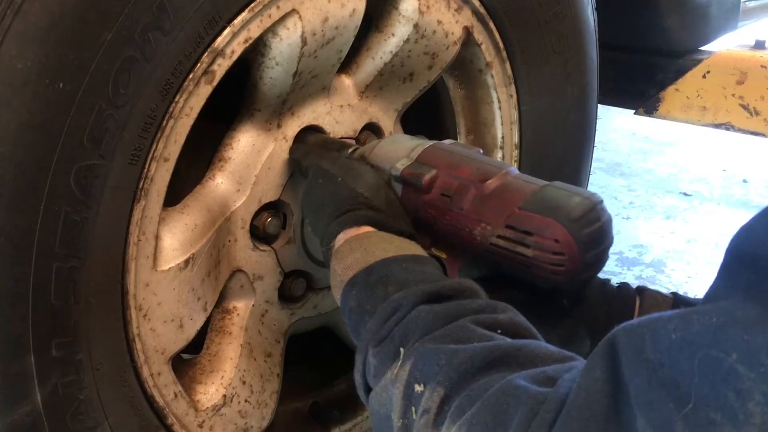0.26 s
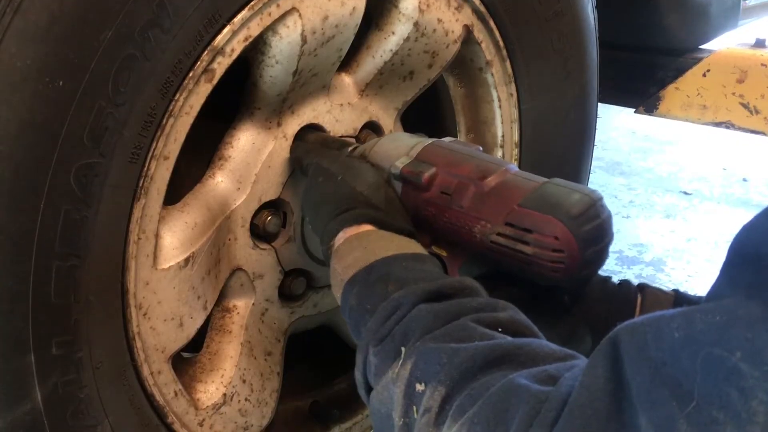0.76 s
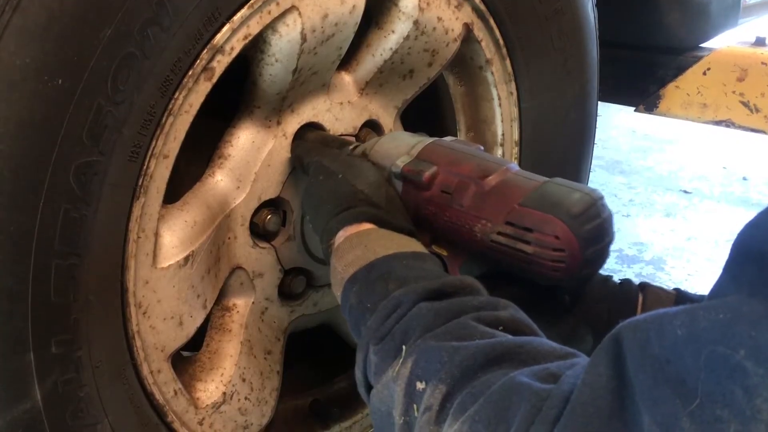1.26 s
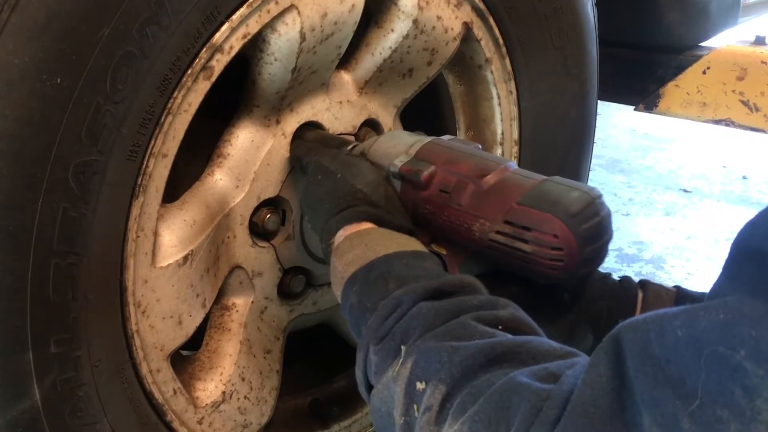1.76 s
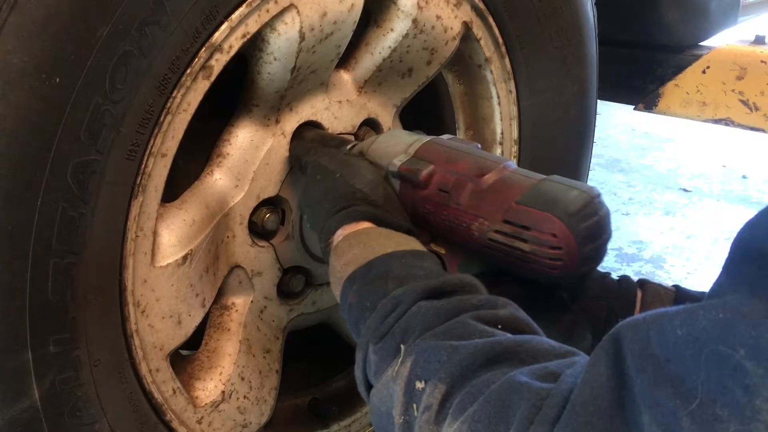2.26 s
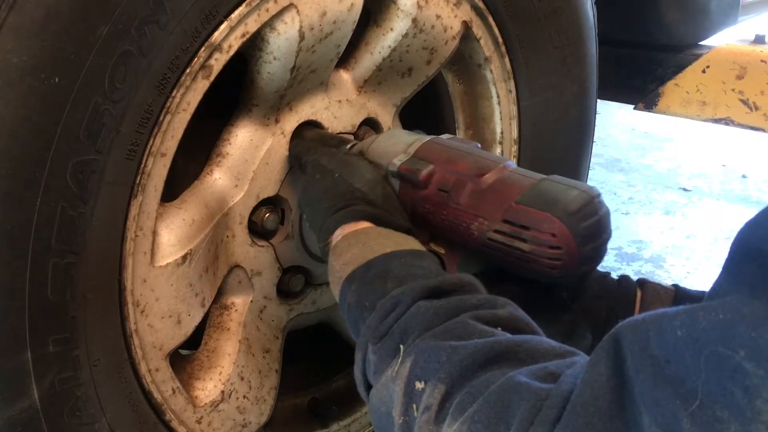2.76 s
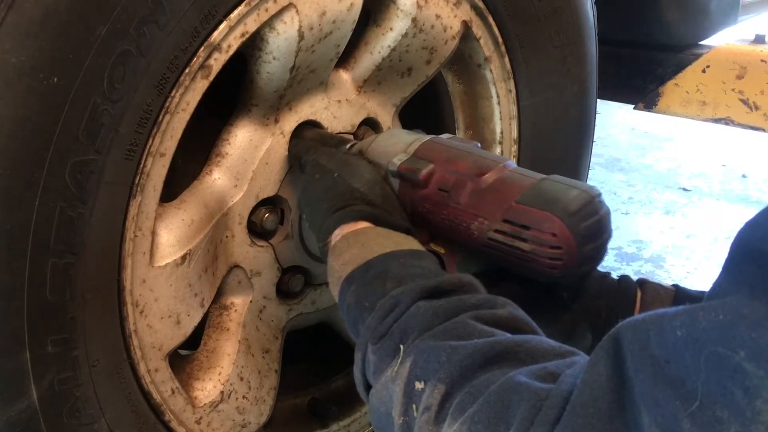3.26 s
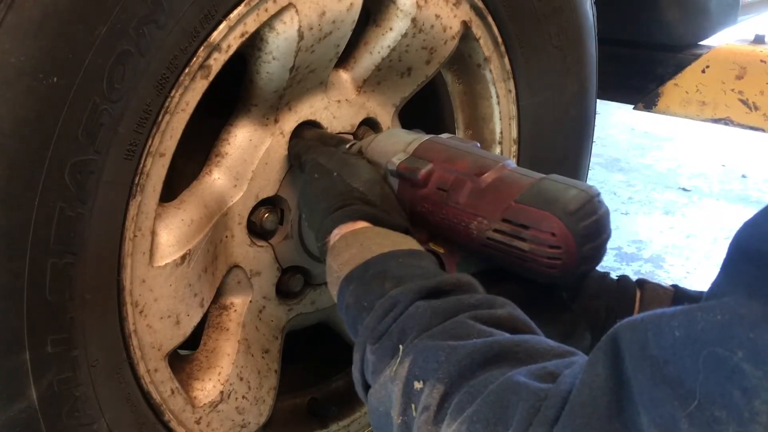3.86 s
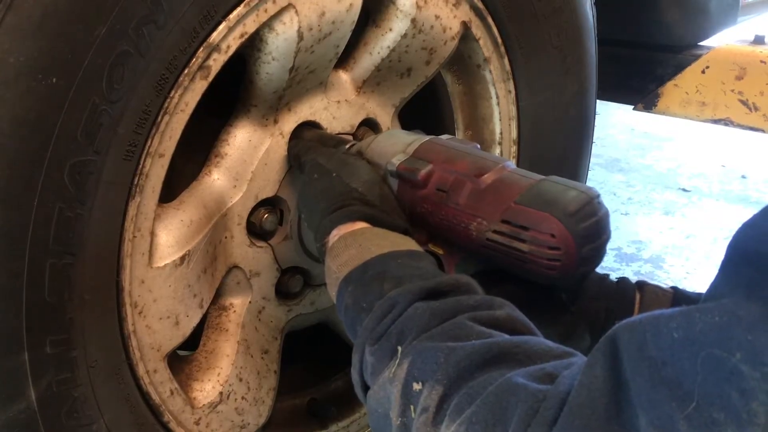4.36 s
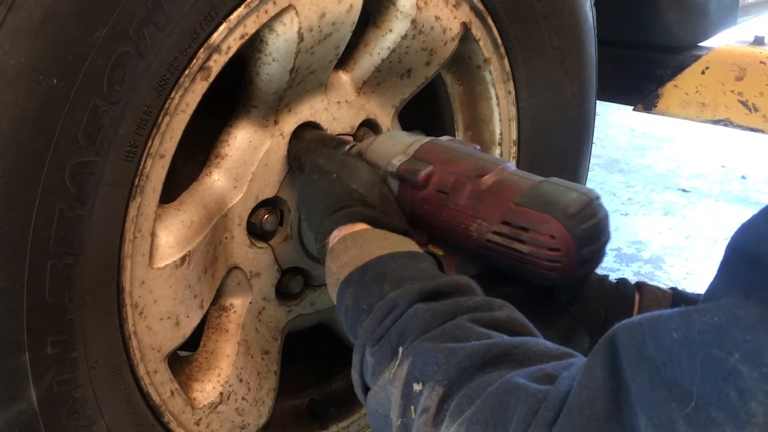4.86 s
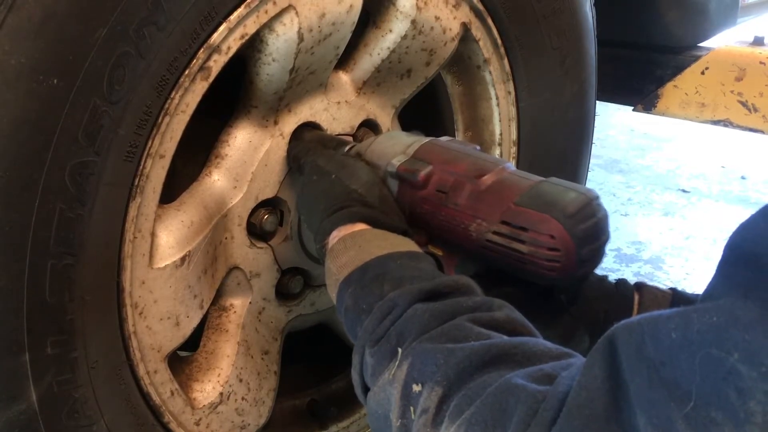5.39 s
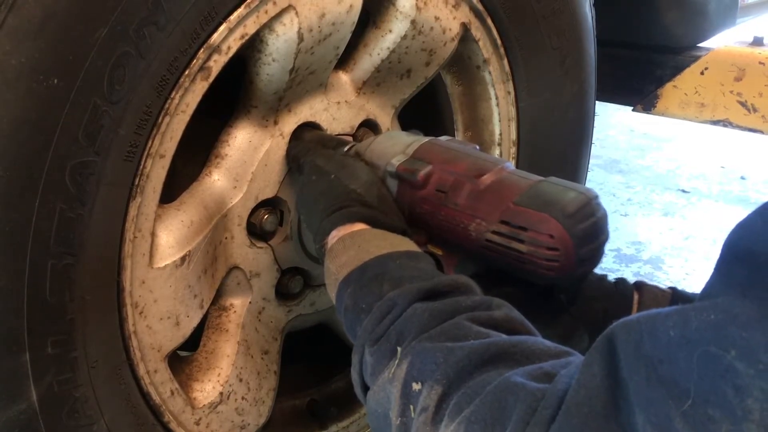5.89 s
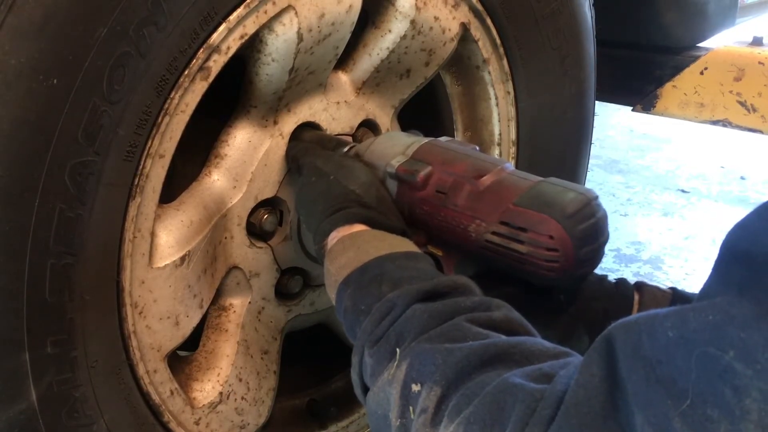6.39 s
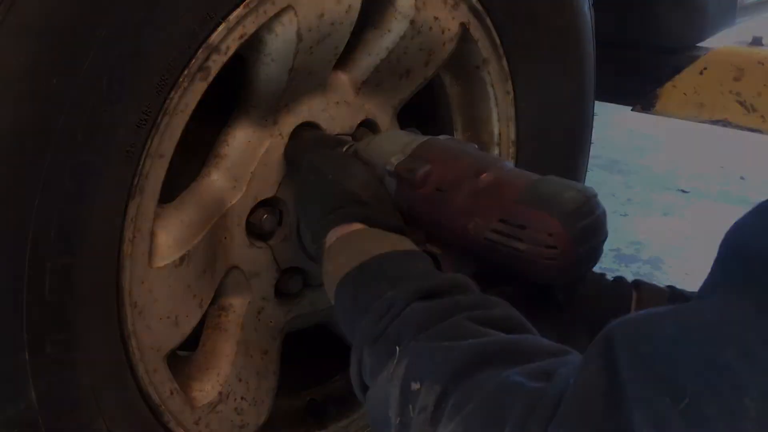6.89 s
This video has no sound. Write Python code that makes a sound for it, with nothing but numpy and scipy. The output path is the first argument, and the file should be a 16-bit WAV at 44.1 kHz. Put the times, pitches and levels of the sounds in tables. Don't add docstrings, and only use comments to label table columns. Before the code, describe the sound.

Close to a small camera outdoors, a cordless impact wrench hammers a seized lug nut without a break, about 37 blows a second. The alloy wheel rings hard in the midrange, the loose socket chatters after each blow and now and then sings out brightly. The hammering is a little lighter at first, then fuller as the socket bites. A faint motor whine and low distant traffic lie underneath.

```python
import sys
import numpy as np
from scipy import signal
from scipy.fft import rfft, irfft, next_fast_len
from scipy.io import wavfile
from scipy.ndimage import uniform_filter1d

SR = 44100
rng = np.random.default_rng(int(sys.argv[2]) if len(sys.argv) > 2 else 0)


def volts_from_db(level):
    exponent = np.asarray(level, float) / 20
    return 10 ** exponent


def store_wav(level_fs):
    pcm = np.round(np.clip(np.atleast_2d(level_fs), -1, 1) * 32767)
    wavfile.write(sys.argv[1], SR, pcm.T.astype(np.int16))


N = 314423
PAD = next_fast_len(N + SR // 2)
GRID_HZ = np.fft.rfftfreq(PAD, 1 / SR)


def unit(x):
    return x / np.sqrt(np.mean(x ** 2) + 1e-20)


def curve(rows, s):
    when, value = np.transpose(rows)
    return np.interp(s, when, value)


def marked(s, rows):
    when, db = np.transpose(rows)
    return np.abs(s[:, None] - when).argmin(axis=0), db


def filtered(x, gain):
    return irfft(rfft(x, PAD) * gain, PAD)[:N]


def body(x, spectrum):
    hz, db = np.transpose(spectrum)
    level_db = np.interp(np.log(GRID_HZ + 1), np.log(hz), db, left=-90)
    cepstrum = irfft(np.log(volts_from_db(level_db) + 1e-5), PAD)
    cepstrum[1:PAD // 2] *= 2
    cepstrum[PAD // 2 + 1:] = 0
    gain = np.exp(rfft(cepstrum))
    return filtered(x, gain / np.sqrt(np.mean(np.abs(gain) ** 2)))


def resonant(x, modes):
    gain = 1
    for hz, width_hz, db in modes:
        damping = 1j * GRID_HZ * width_hz
        gain = gain + volts_from_db(db) * damping / (hz * hz - GRID_HZ ** 2 + damping)
    return filtered(x, gain)


RATE_HZ, STRIKES = 36.7, 262
# (time [s], lag [ms])
DRAG = [(0.0, 13.3), (0.436, 14.6), (0.572, 19.7), (0.763, 16.8), (1.09, 23.4), (1.907, 18.1),
        (2.125, 20.2), (2.698, 17.5), (2.861, 19.8), (3.569, 21.0), (3.815, 19.1), (3.869, 21.5),
        (4.469, 24.9), (5.586, 20.7), (5.967, 24.0), (6.621, 16.9), (6.812, 12.1), (7.084, 10.2)]


def blows():
    lead_ms, jitter_ms = 2.2, 0.3
    beat = np.arange(STRIKES) / RATE_HZ
    lag_ms = curve(DRAG, beat)
    return beat + (lag_ms - lead_ms + jitter_ms * rng.standard_normal(STRIKES)) / 1000


def contacts(count=9):
    approach_db, strike_db, shared_spread_db = -6.5, 1, 0.5
    loose_spread = 0.42
    hush_spread_db = 2.5
    gap_s = 0.00065 + 0.00259 * rng.random((STRIKES, count))
    gap_s[:, 0] = 0
    size_db = shared_spread_db * rng.standard_normal((STRIKES, count))
    size_db[:, :2] += [approach_db, strike_db]
    wear_s = np.cumsum(gap_s, axis=1)
    gap_s[:, 1] *= 0.6
    gap_s[:, 2:] *= np.exp(loose_spread * rng.standard_normal((STRIKES, 1)))
    hush_db = hush_spread_db * rng.standard_normal(STRIKES)
    return np.cumsum(gap_s, axis=1), wear_s, size_db, hush_db


def dying(power, t60_s, rise_s=0.0015):
    half = int(rise_s * SR)
    built = uniform_filter1d(power, half * 2 + 1, origin=half)
    decay = np.exp(-2 * np.log(1000) / (t60_s * SR))
    return np.abs(signal.lfilter([1], [1, -decay], built))


def patchy(depth_db):
    z = signal.stft(rng.standard_normal(N + 512), nperseg=512)[2]
    field = uniform_filter1d(rng.standard_normal(z.shape), size=2, axis=0)
    field = uniform_filter1d(field, size=7, axis=1)
    return unit(signal.istft(z * volts_from_db(depth_db * unit(field)), nperseg=512)[1][:N])


def ringing(force, s, t60_s, count=3):
    t = np.arange(SR // 5) / SR
    families = rng.standard_normal((count, len(t))) * volts_from_db(-60 * t / t60_s)
    families /= np.linalg.norm(families[0])
    shares = rng.standard_normal((count, len(s) + 1))
    shares /= np.linalg.norm(shares, axis=0)
    latest_blow = np.searchsorted(s, np.arange(N) / SR)
    parts = force * shares[:, latest_blow]
    return irfft((rfft(parts, PAD) * rfft(families, PAD)).sum(axis=0), PAD)[:N]


def shaking(s, touch, blow_db, scatter_db, fade_db, snap_s, tail_db, tail_s, gears_db, patchy_db):
    delay_s, wear_s, size_db, hush_db = touch
    scatter = scatter_db * rng.standard_normal(delay_s.shape)
    share = volts_from_db(2 * (size_db + fade_db * wear_s / 0.0068 + scatter))
    share /= share.sum(axis=1, keepdims=True)
    at = np.clip(np.round((s[:, None] + delay_s) * SR).astype(int), 0, N - 1)
    hits = np.bincount(at.ravel(), (volts_from_db(2 * blow_db)[:, None] * share).ravel(), N)
    between_db = uniform_filter1d(blow_db, size=5) + hush_db
    mesh = volts_from_db(2 * (np.interp(np.arange(N) / SR, s + 0.019, between_db) + gears_db))
    force = np.sqrt(dying(hits, snap_s) + mesh) * patchy(patchy_db)
    return force + volts_from_db(tail_db) * ringing(force, s, tail_s)


# (frequency [Hz], density [dB per Hz])
TYRE = [(110, -46), (190, -12), (318, 3.5), (419, 2), (460, 0), (602, 3), (793, -2.5), (850, -7.5),
        (1100, -50), (1870, -120)]


def tyre(s, touch, seated, luck):
    blow_db = -45 + 9 * seated + 9 + 1.7 * luck
    return body(shaking(s, touch, blow_db, scatter_db=2, fade_db=-5.5, snap_s=0.016, tail_db=-13,
                        tail_s=0.073, gears_db=-17.5, patchy_db=0.5), TYRE)


# (frequency [Hz], density [dB per Hz])
HUB = [(500, -37), (850, -11.5), (933, -10), (1010, -7), (1070, -1.5), (1220, -8), (1370, -7.5),
       (1730, -2.5), (1960, -6.5), (2250, -9), (2920, -56), (4950, -120)]


def hub(s, touch, seated, luck):
    blow_db = -31.5 + 4.5 * seated + 9 + 0.71 * luck
    return body(shaking(s, touch, blow_db, scatter_db=4, fade_db=-13, snap_s=0.012, tail_db=-5,
                        tail_s=0.47, gears_db=-15.5, patchy_db=-1), HUB)


# (frequency [Hz], density [dB per Hz])
WHEEL = [(1320, -19.5), (2250, -27), (2330, -10.5), (2520, -6.5), (2710, -3.5), (3250, 2), (3750, -1.5),
         (4020, -5.5), (4330, -3), (5000, -20), (6500, -35), (11000, -120)]


def wheel(s, touch, seated, aim_db):
    blow_db = -16.5 + 4.5 * seated + aim_db + 6
    return body(shaking(s, touch, blow_db, scatter_db=0, fade_db=-5, snap_s=0.0098, tail_db=-4,
                        tail_s=0.17, gears_db=-23, patchy_db=-1), WHEEL)


# (frequency [Hz], density [dB per Hz])
ANVIL = [(3000, -48), (5100, -6), (5500, -20), (5610, -13), (5850, -4), (6500, -5.5), (7400, -0.5),
         (7660, -1.5), (7850, -9), (8200, -2), (10700, -40), (18000, -120)]


def anvil(s, touch, anvil_db, luck):
    blow_db = anvil_db + 12.5 + 1.84 * luck
    return body(shaking(s, touch, blow_db, scatter_db=3, fade_db=-3, snap_s=0.0096, tail_db=-5,
                        tail_s=0.34, gears_db=-29, patchy_db=0.5), ANVIL)


# (frequency [Hz], density [dB per Hz])
SOCKET = [(4820, -43), (8200, -18.5), (8930, 1.5), (9300, 3), (9590, -3.5), (10300, -21), (13400, -20),
          (22000, -120)]


def socket(s, touch, anvil_db, clang_db, luck):
    blow_db = anvil_db + 11.5 + 1.7 * luck
    chatter = shaking(s, touch, blow_db, scatter_db=7, fade_db=2.5, snap_s=0.0095, tail_db=-0.5,
                      tail_s=0.033, gears_db=-28.5, patchy_db=-0.5)
    song = shaking(s, touch, clang_db - 0.5, scatter_db=-8.5, fade_db=-20.5, snap_s=0.0025, tail_db=5,
                   tail_s=0.093, gears_db=-43, patchy_db=3)
    return body(chatter + song, SOCKET)


# (frequency [Hz], density [dB per Hz])
HOUSING = [(9000, -60), (10400, -21), (10800, -17), (11500, -8), (12300, -5), (13100, 0), (13900, -2),
           (14400, -5), (15000, -1), (15250, -13), (15600, -17), (15700, -11), (16000, -60)]


def housing(s, touch, blow_db):
    return body(shaking(s, touch, blow_db, scatter_db=0, fade_db=-3, snap_s=0.0099, tail_db=-7.5,
                        tail_s=0.1, gears_db=-22, patchy_db=0), HOUSING)


# (time [s], share [0-1])
SEATED = [
    (0, 0.28),
    (.6, 0),
    (1.1, 0.5),
    (1.5, 0.84),
    (2.0, 0.94),
    (3.0, 1.01),
    (7.13, 0.99),
]
# (time [s], peak level [dB])
CLANGS = [(0.068, -14), (0.699, -23), (1.058, -11), (1.14, -14.0), (1.167, -11), (1.438, -4), (1.871, -8),
          (2.227, -9), (2.308, -10), (2.363, -10), (3.29, -13.0), (3.399, -18), (3.481, -8.5), (3.509, -24),
          (4.11, -8), (4.192, -13.5), (4.329, -13), (4.439, -11.0), (4.521, -14.0), (5.009, -8.0),
          (5.308, -11.0), (5.552, -11.0), (5.826, -15), (6.072, -8), (6.261, -14.0), (6.423, -14),
          (6.476, -20), (6.53, -12.5), (6.638, -7.5), (7.095, -13.0)]
# (time [s], level over the usual [dB])
ODD_BLOWS = [(0.068, 1), (0.423, 3.5), (0.535, -2), (1.086, 3.5), (1.438, -6.0), (1.546, -5.0), (1.574, 3),
             (1.628, -1), (1.709, -6), (1.925, 1.5), (1.981, -5), (2.227, -1), (2.308, -7), (2.335, 0.5),
             (2.607, 2.5), (2.715, 1.5), (2.743, -1.5), (2.798, -2.5), (2.853, -2.5), (2.881, -6),
             (2.908, -2), (3.017, 2), (3.045, -0.5), (3.127, 1), (4.494, 4), (5.254, 0.5), (5.744, 1),
             (5.909, 3.5), (6.638, -1.5), (6.718, 4)]
# (frequency [Hz], width [Hz], level over the body [dB])
SPOKES = [(749, 11, -1), (1020, 130, -8), (1795, 40, -1), (2407, 20, 6), (2773, 45, 1), (2989, 45, 0),
          (3355, 60, -2), (3630, 45, -4), (3854, 40, 1), (4196, 55, 0), (5817, 70, 2), (7413, 60, 2),
          (7674, 90, -3), (8330, 16, 2), (9988, 22, 2)]


def wrench():
    faint_db, faint_spread_db = -27, 9
    stolen = 0.07
    s = blows()
    seated = curve(SEATED, s)
    anvil_db = -35.5 + 5 * seated
    luck = rng.standard_normal((7, len(s)))

    clang_db = faint_db + anvil_db - anvil_db.max() + faint_spread_db * np.minimum(luck[6], 1)
    singing, sung_db = marked(s, CLANGS)
    clang_db[singing] = sung_db

    aim_db = 0.77 * luck[5] - stolen * np.maximum(clang_db - faint_db - 9, 0)
    odd, odd_db = marked(s, ODD_BLOWS)
    aim_db[odd] = odd_db

    housing_db = anvil_db + 10.5 + 1.0 * seated + 0.3 * aim_db + 0.04 * (clang_db - faint_db)
    housing_db += 1.8 * luck[3] + 0.66 * luck[4]

    touch = contacts()
    parts = tyre(s, touch, seated, luck[0])
    parts += hub(s, touch, seated, luck[1])
    parts += wheel(s, touch, seated, aim_db)
    parts += anvil(s, touch, anvil_db, luck[2])
    parts += socket(s, touch, anvil_db, clang_db, luck[4])
    parts += housing(s, touch, housing_db)
    return resonant(parts, SPOKES)


def motor():
    whine_hz, drift_hz, level_db = 748, 3.96, -51.5
    seated = curve(SEATED, np.arange(N) / SR)
    drift = unit(uniform_filter1d(rng.standard_normal(N), size=SR // 8))
    phase = 2 * np.pi * np.cumsum(whine_hz + drift_hz * drift) / SR
    return volts_from_db(level_db + 8 * (seated - 1)) * np.sin(phase)


# (frequency [Hz], density [dB per Hz])
RUMBLE = [(13, -34), (22, -15), (37, -3), (54, -4.5), (86, -2.5), (140, -16), (160, -17), (210, -28),
          (350, -120)]
# (frequency [Hz], width [Hz], level over the rumble [dB])
HUM = [(42.6, 17, 2.7)]


def rumble():
    return volts_from_db(-53.5) * resonant(body(rng.standard_normal(N), RUMBLE), HUM)


def scene():
    return (wrench() + motor() + rumble())[None]


def band_limit(x):
    return signal.sosfilt(signal.butter(12, 15760, fs=SR, output="sos"), x)


def record(dry):
    ceiling, top_hz = 1.15, 15760
    soft = dry / (1 + np.abs(dry / ceiling) ** 4) ** (1 / 4)
    mix = irfft(rfft(soft) * (np.fft.rfftfreq(N, 1 / SR) < top_hz), N)
    return band_limit(mix)


dry = scene()
out = record(dry)
store_wav(out)
```